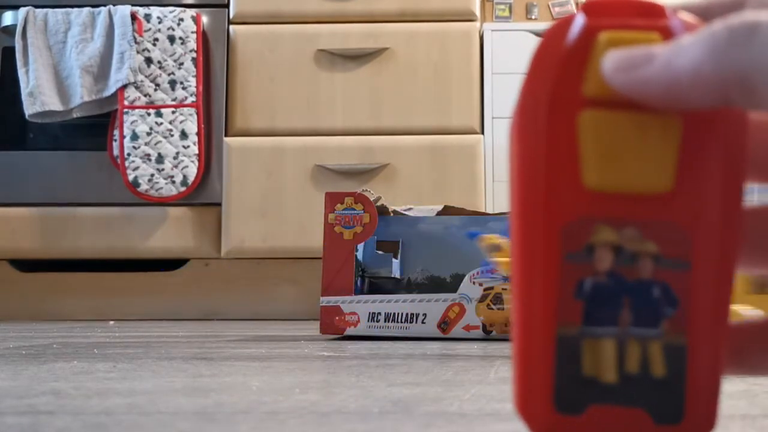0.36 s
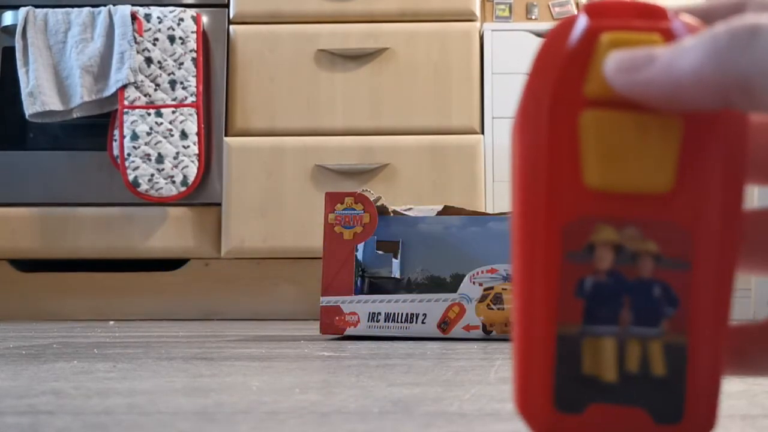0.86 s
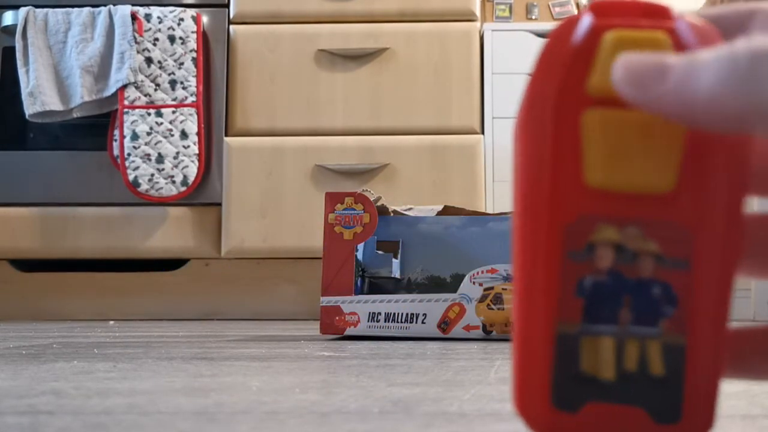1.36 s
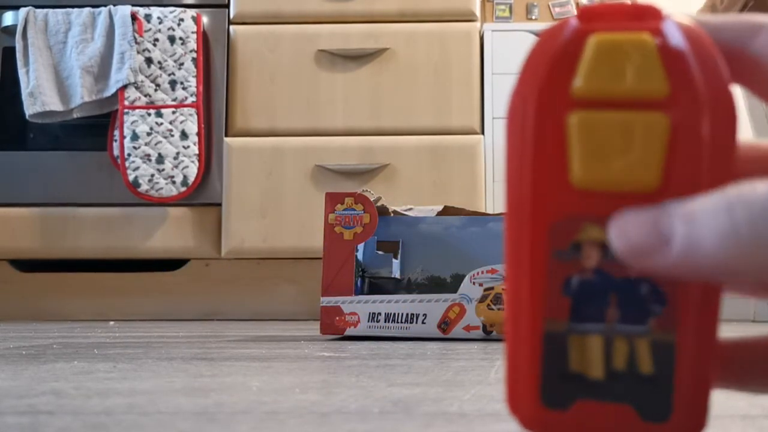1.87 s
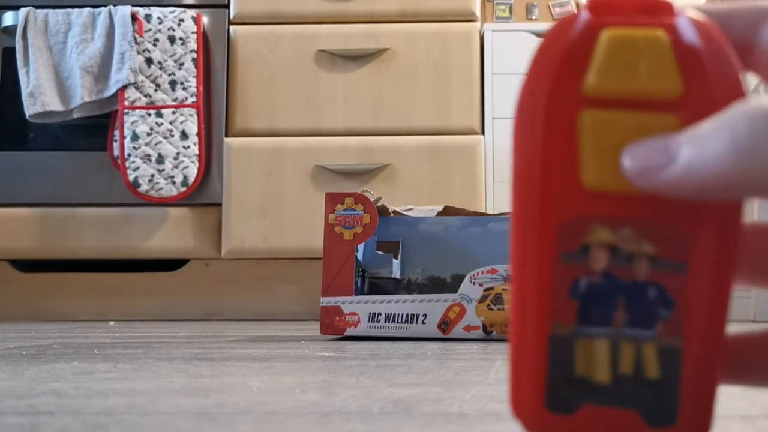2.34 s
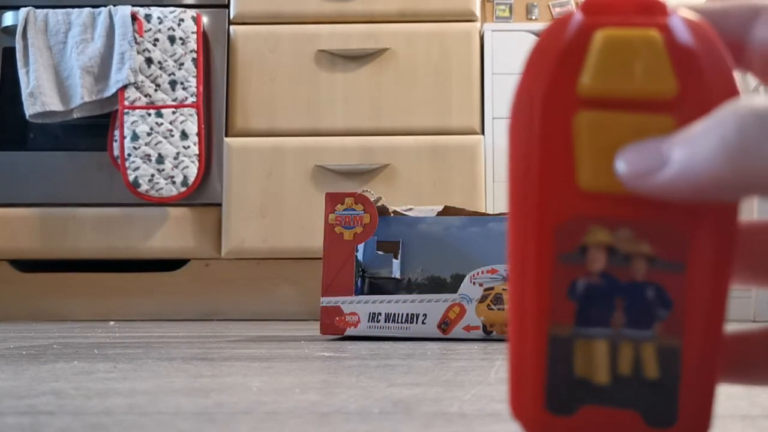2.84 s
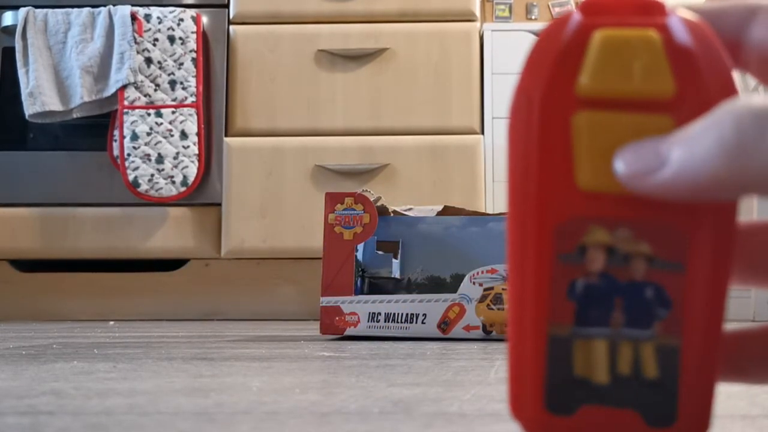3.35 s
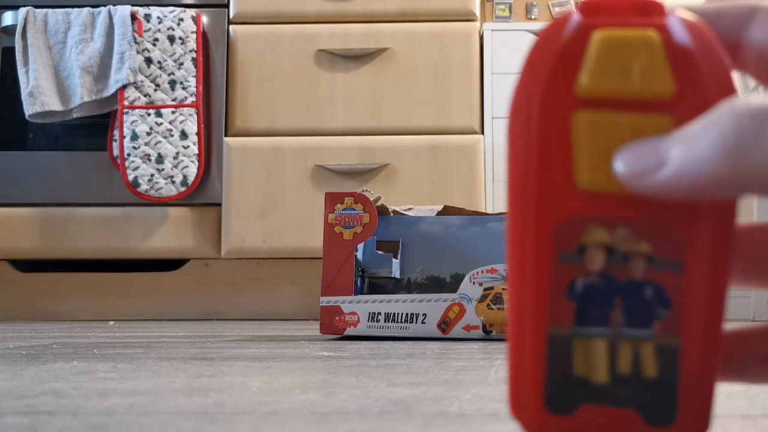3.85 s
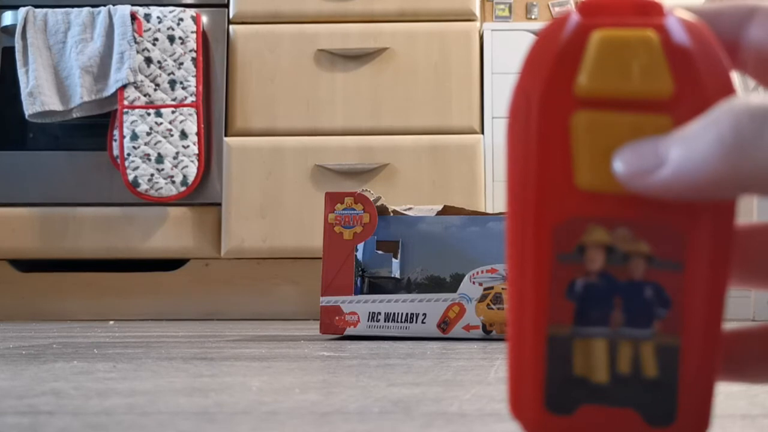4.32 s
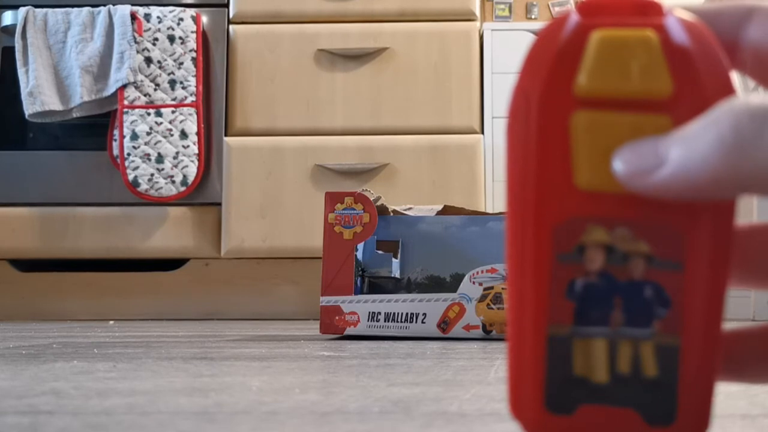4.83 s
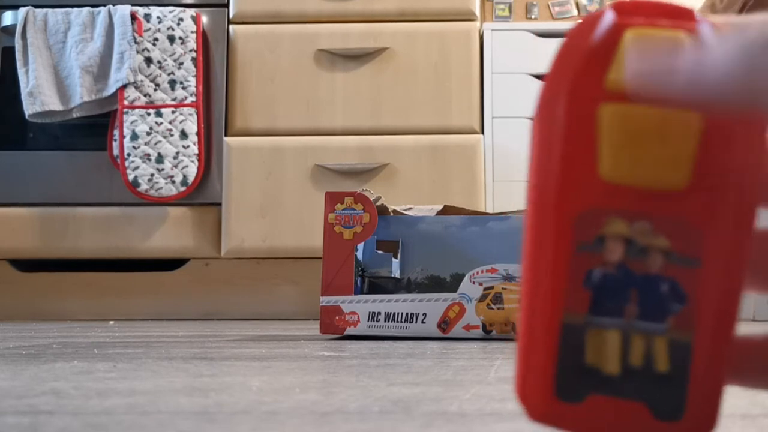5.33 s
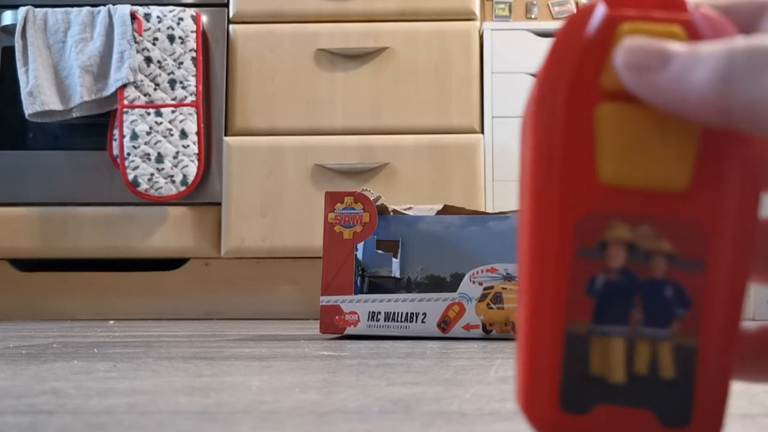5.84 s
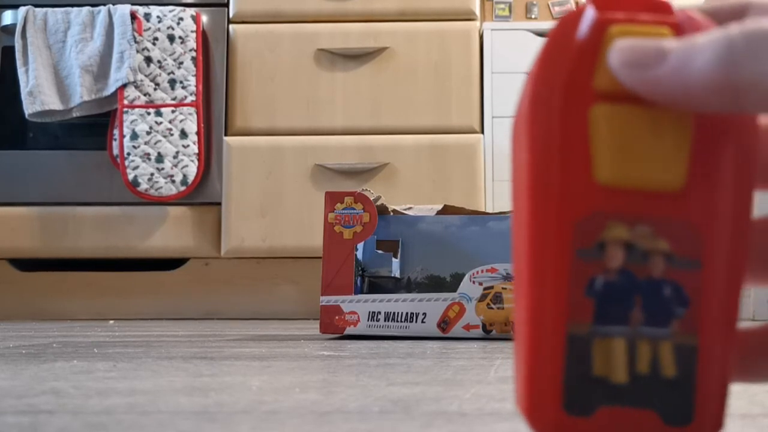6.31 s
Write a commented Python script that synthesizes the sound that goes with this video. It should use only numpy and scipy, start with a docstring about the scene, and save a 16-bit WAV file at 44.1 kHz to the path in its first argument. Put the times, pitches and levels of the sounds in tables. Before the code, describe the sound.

Buzzy plastic gears and a tiny motor drive over a hard floor in three runs, with short pauses and close button clicks.

```python
"""A small hard kitchen: a battery toy drives over the floor, right of a phone with two microphone ports.
Noise and tooth knocks shake five resonant bodies (boards, shell, gearbox, loose trim, motor); seams add jolts,
and sine overtones make the gear whine. Twice the drive dies away and starts again. Close by, a thumb hisses
along the remote, its buttons ring as short modes and a hand rubs the case. Scattered tails make the room."""
import sys
import numpy as np
from scipy import signal
from scipy.fft import rfft, irfft, next_fast_len
from scipy.io import wavfile
from scipy.ndimage import map_coordinates

SR = 44100
rng = np.random.default_rng(int(sys.argv[2]) if len(sys.argv) > 2 else 0)


def store_wav(level_fs):
    """Save 16-bit WAV to argv[1]."""
    pcm = np.round(np.clip(np.atleast_2d(level_fs), -1, 1) * 32767)
    wavfile.write(sys.argv[1], SR, pcm.T.astype(np.int16))


def field_ratio(decibels):
    """Amplitude ratio for a level in dB (20 dB per decade); scalars and array-likes work."""
    return 10 ** (np.asarray(decibels, dtype=float) / 20)


N = 284004
T = np.arange(N) / SR  # seconds

# Room and microphone noise. Each row: frequency in Hz, relative density in dB per Hz.
HUSH_COLOUR = [(20, -11.5), (86, -10.5), (220, -15), (400, -21), (650, -23.5), (5800, -36), (8000, -44),
               (9500, -49.5), (15000, -47)]
# Likeness of that noise at the two ports. Each row: frequency in Hz, left-right likeness from 0 to 1.
HUSH_LIKENESS = [(40, 0.53), (150, 0.19), (400, 0.38), (2000, 0.37), (8000, 0.13)]
# Room over direct sound. Each row: frequency in Hz, level in dB.
ROOM_LEVEL = [(300, -18), (1000, -11), (2500, 0), (5000, 7), (8000, 12)]
# Room decay; cupboards scatter the treble close by. Each row: frequency in Hz, t60 in seconds.
ROOM_T60 = [(300, .25), (2000, .09), (4500, .035), (8000, .025)]
# Microphone response. Each row: frequency in Hz, gain in dB.
MIC_RESPONSE = [(1500, -1.5), (7200, -5.5), (8000, -13), (9000, -19), (10000, -29), (15000, -33)]
# Shading of the ports by the phone's body. Each row: frequency in Hz, left over right in dB.
PORT_TILT = [(60, -2), (160, -3), (420, -5), (1100, -8), (2900, -6), (7640, -2)]
# The toy's bearing. Each row: time in seconds, left over right in dB, on top of the shading.
BEARING = [(0, 0), (.9, -0.5), (1.4, 2), (5.3, 2.5), (6.44, 1.5)]

# Thumb sliding over the remote. Each row: time in seconds, level in dB.
THUMB_SLIDE = [(2.13, -79), (2.236, -61.5), (2.34, -69), (2.48, -61)]
# Colour of skin on plastic. Each row: frequency in Hz, relative density in dB per Hz.
SKIN_COLOUR = [(300, -16), (900, -5.5), (2000, -13), (2800, -24), (6900, -19.5), (9000, -54)]
# Hand on the case. Each row: start in seconds, length in seconds, stroke gain in dB, rustle share from 0 to 1.
HAND_RUBS = [(4.9, 0.045, -57, 0.7), (5.276, 0.078, -63.5, 0.78), (5.45, 0.063, -60.5, 0.26),
             (5.678, 0.18, -58.5, 0.75), (5.948, 0.032, -63, 0.63), (6.225, 0.078, -62.5, 0.32),
             (6.326, 0.12, -71, 0.5)]
# Button clicks. Each row: start in seconds, gain in dB, case boom in dB, snap in dB, ring length share.
BUTTON_CLICKS = [(2.321, -47.5, 2.5, -19, 0.43), (2.342, -43.5, -35, -22, 1), (2.405, -48, -25, 7, 0.93),
                 (2.407, -29.5, -10, 0.5, 0.8), (5.391, -20, -2.5, 9.5, 1.01)]
# Modes of the remote's case. Each row: frequency in Hz, relative level in dB, t60 in seconds.
REMOTE_MODES = [(760, -7.5, 0.16), (822, -9, 0.15), (770, 5.5, 0.033), (640, -16, 0.014), (1168, 3, 0.015),
                (1250, 8, 0.017), (1426, 6.5, 0.018), (1820, 9.5, 0.012), (2550, 6, 0.018),
                (3200, 0, 0.017), (4650, -1, 0.0094), (5430, 0, 0.0074), (6560, -1.5, 0.0053)]

# Gear whine in the first two runs. Each row: time in seconds, rough pitch of the blurred whine in Hz, gain in dB.
GEAR_WHINE = [
    [(0.0, 1254, -47), (0.178, 1233, -51), (0.196, 1343, -52), (0.396, 1214, -45), (0.476, 1303, -48),
     (1.212, 1252, -49.5), (1.234, 1362, -56.5), (1.448, 1210, -48.5), (1.518, 1362, -63), (1.6, 1308, -57)],
    [(2.5, 1253, -56), (2.66, 1362, -55), (2.84, 1235, -50), (2.92, 1362, -58), (2.96, 1223, -44),
     (3.11, 1281, -46.5), (4.19, 1284, -55), (4.34, 1203, -56), (4.4, 1288, -52), (5.55, 1290, -55.5)],
]
# Wheels and floor. Each row: resonance in Hz, width in Hz, relative level in dB.
BOARD_MODES = [(225, 140, -19), (374, 38, -2.5), (506, 79, -6.5), (680, 162, -0.5), (818, 197, -0.5)]
# Plastic shell. Each row: resonance in Hz, width in Hz, relative level in dB.
SHELL_MODES = [(946, 400, -6.5), (1265, 175, 4.5), (1472, 402, -3.5)]
# Gearbox. Each row: resonance in Hz, width in Hz, relative level in dB.
GEARBOX_MODES = [(1687, 194, -2), (1977, 153, 4), (2386, 510, -2)]
# Rattling trim. Each row: resonance in Hz, width in Hz, relative level in dB.
TRIM_MODES = [(3020, 500, 0.5), (3725, 420, 1), (4490, 660, -5.5)]
# Motor. Each row: resonance in Hz, width in Hz, relative level in dB.
MOTOR_MODES = [(4950, 320, -2), (5816, 570, 1.5), (6464, 350, 6.5), (6744, 900, -1)]
# Button held. Each row: on in seconds, off in seconds, spin-up time constant in seconds,
# then wheel rumble, gearbox and loose parts, each in dB over the shell.
DRIVE_RUNS = [(-1, 1.507, .1, -7, -0.47, -7.5), (2.5, 5.529, 0.17, -7.5, -1.1, -6.5),
              (5.715, 8, 0.39, -8.5, 2.1, -9)]
# Distance and floor. Each row: time in seconds, drive gain in dB, extra for loose parts and motor in dB.
DRIVE_LEVEL = [(0, -43, -2.5), (.11, -47.5, -4), (.19, -50.5, -8), (.31, -48, 0.5), (.4, -45, 1.5),
               (.55, -47.5, 1), (.75, -45.5, 1.5), (.87, -43.5, -2.5), (1.02, -41, -0.5), (1.15, -45.5, 3),
               (1.33, -47, 1.5), (1.45, -45.5, 4), (2.6, -42, -1.5), (2.85, -44.5, -4), (3.1, -41.5, 0),
               (3.28, -41.5, -1), (3.43, -47, -7), (3.65, -49, 4), (4.1, -49.5, 0.5), (4.75, -49, 1.5),
               (4.95, -50.5, 0.5), (5.35, -50.5, -4), (5.5, -53, 0), (5.7, -46.5, -3), (5.8, -49, 3),
               (5.855, -44.5, -7), (5.885, -42.5, -6), (5.92, -44.5, -1), (6.02, -49, 0), (6.1, -46.5, 1),
               (6.2, -48, 0), (6.29, -44, 1), (6.37, -45.5, 0), (6.44, -51, 0)]
# The gearbox as the toy turns. Each row: time in seconds, gain in dB.
GEARBOX_TURNING = [(0, 1), (.3, -1), (.7, -1), (.85, 2), (1.08, 2), (1.25, 0), (1.55, 2), (2.55, -3),
                   (2.9, -1), (3.3, 0), (5.5, 0), (5.8, 0), (5.95, 3.5), (6.1, 0), (6.3, 0)]
# Wheels over seams. Each row: time in seconds, knock in dB, rattle in dB, both before each part's share.
SEAM_JOLTS = [(0.114, -28, -38), (0.246, -36, -33), (0.342, -23, -33), (0.376, -29, -40),
              (0.411, -28.5, -44), (0.427, -31, -42), (0.473, -24, -35), (0.557, -36, -29),
              (0.587, -22.5, -34), (0.643, -38, -48), (0.674, -27.5, -37), (0.688, -26, -34),
              (0.773, -30, -38), (0.796, -28, -38), (0.812, -30, -40), (0.826, -29, -38), (0.905, -28, -38),
              (0.929, -26.5, -38), (0.976, -30, -33), (1.01, -28, -36), (1.083, -30, -38),
              (1.125, -32, -36), (1.178, -27.5, -33.5), (1.216, -30, -36), (1.383, -30, -36),
              (1.764, -53, -70), (1.808, -52, -62), (2.565, -40, -50), (2.637, -33, -43), (2.668, -31, -43),
              (2.686, -37, -59), (2.711, -39, -44), (2.744, -39, -43), (2.758, -30.5, -40.5),
              (2.809, -31, -49), (2.832, -29, -37), (2.948, -32, -38), (2.962, -33, -38), (3.129, -29, -37),
              (3.162, -26, -35), (3.272, -30, -37), (3.347, -37, -32.5), (3.488, -31, -41.5),
              (3.626, -39, -45), (3.875, -33.5, -37), (4.477, -45, -38), (4.722, -33, -38),
              (4.816, -42, -37.5), (5.353, -44, -48), (5.907, -52, -50), (5.994, -48, -61)]
# Gears taking up their slack. Each row: time in seconds, level in dB.
SLACK_KNOCKS = [(2.485, -56), (2.497, -43.5), (2.52, -50)]

# Settings with five values run: rumble, shell, gearbox, loose parts, motor.
COAST_DB_PER_S = 130, 150, 175, 190, 205  # fade after power off
JOLT_SHARE_DB = (-16.5, -17, -19, -8.5, -14.5)  # the first three share the knock, the last two the rattle
JOLT_TAP_DB = (22, 24, 20, 24, 21)  # first sharp tap of a jolt over its noise
CHATTER_SHARE_DB = (-8, -6, -4.5, -6, -8)  # backlash taps felt by all parts


def unit(x):
    """Scaled to rms 1."""
    return x / np.sqrt(np.mean(x ** 2) + 1e-20)


def along(points, hz):
    """Reads (Hz, value) points on a log frequency axis."""
    f, v = np.transpose(points)
    return np.interp(np.log(hz + 1), np.log(f + 1), v)


def curves(rows):
    """One value per sample for each column after the time, and a gate with 10 ms ends."""
    s, *columns = np.transpose(rows)
    gate = np.clip(np.minimum(T - s[0], s[-1] - T) / .01 + 1, 0, 1)
    return [np.interp(T, s, column) for column in columns], gate


def wobble(rate):
    """A smooth random curve, rate knots a second."""
    return map_coordinates(rng.standard_normal(int(N * rate / SR) + 4), [T * rate])


def filtered(x, response):
    """x times a complex response of frequency."""
    m = next_fast_len(N + SR // 2)
    return irfft(rfft(x, m) * response(np.fft.rfftfreq(m, 1 / SR)), m)[..., :N]


def body(modes, low_hz):
    """Causal resonances, thinned out below low_hz, scaled so that white noise keeps its rms."""
    def response(f):
        ring = 0
        for k, (hz, width, db) in enumerate(modes):
            resonance = 1j * f * width / (hz * hz - f * f + 1j * f * width)
            ring = ring + (-1) ** k * field_ratio(db) * resonance
        ring = ring * (1j * f / (low_hz + 1j * f)) ** 2
        return ring / np.sqrt(np.mean(abs(ring) ** 2))
    return response


def hush():
    """Steady background noise; a shared part and an opposed part make the two ports partly alike."""
    def shape(hz):
        turn = np.arccos(np.clip(along(HUSH_LIKENESS, hz), -1, 1)) / 2
        return field_ratio(along(HUSH_COLOUR, hz)) * [np.cos(turn), np.sin(turn)]
    mid, side = filtered(rng.standard_normal((2, N)), shape)
    return field_ratio(-67.5) * unit(np.array([mid + side, mid - side]))


def room(x):
    """Noise tails decay at each frequency's own speed; new echoes 30 times a second follow the moving toy."""
    step, wet = SR // 30, np.zeros((2, N + 2 * SR))
    starts = np.arange(0, N + step, step)
    pieces = np.pad(x, (step, 2 * step))[starts[:, None] + np.arange(2 * step)] * np.hanning(2 * step)
    hz, t, z = signal.stft(rng.standard_normal((len(starts), 2, SR // 8)), SR, nperseg=256)
    z = z * field_ratio(-60 * t / along(ROOM_T60, hz)[:, None])
    energy = np.linalg.norm(z, axis=3).mean(1)[:, None, :, None]
    tails = signal.istft(z / energy, SR, nperseg=256)[1]
    tails = tails / np.linalg.norm(tails[:, :1], axis=2, keepdims=True)
    for start, answer in zip(starts, signal.fftconvolve(pieces[:, None], tails, axes=2)):
        wet[:, start:start + answer.shape[1]] += answer
    delayed = wet[:, step - 130:][:, :N]  # the room answers 130 samples late
    return filtered(delayed, lambda hz: field_ratio(along(ROOM_LEVEL, hz)))


def hand():
    """A soft skin hiss along the remote, then short low stick-slip hums and rustle."""
    (slide_db,), sliding = curves(THUMB_SLIDE)
    hiss = unit(filtered(rng.standard_normal(N), lambda hz: field_ratio(along(SKIN_COLOUR, hz))))
    hum_hz = 255 * (1 + 0.0806 * wobble(70))
    hum = np.sin(2 * np.pi * np.cumsum(hum_hz) / SR) * field_ratio(8.5 + 2.4 * wobble(60))
    palm = body([(170, 410, -4.5), (246, 51, -4.0), (480, 99, -8.5)], low_hz=80)
    rustle = 2.0 * unit(filtered(rng.standard_normal(N), palm))
    out = sliding * field_ratio(slide_db) * hiss
    rise, fall = 508, 357  # dB per second, before and after each rub
    for s, length, db, share in HAND_RUBS:
        stroke = field_ratio(db - rise * np.clip(s - T, 0, None) - fall * np.clip(T - s - length, 0, None))
        out += stroke * (hum + np.clip(share, 0, 1) * (rustle - hum))
    return out


def buttons():
    """Each click rings the remote's case: low modes follow the boom, high modes the snap; the grip damps it."""
    out, t = np.zeros(N), np.arange(SR // 5) / SR
    for s, db, boom_db, snap_db, free in BUTTON_CLICKS:
        ring = np.zeros(len(t))
        for hz, level_db, t60 in REMOTE_MODES:
            share_db = boom_db if hz < 950 else snap_db if hz > 4000 else -3
            mode_db = level_db + share_db + rng.normal(0, 0.37)
            ring += field_ratio(mode_db - 60 * t / (t60 * free)) * np.sin(2 * np.pi * hz * t)
        crack = 0.48 * field_ratio(-60 * t / 0.012) * rng.standard_normal(len(t))
        attack = 1 - np.exp(-t / 0.0014)
        out[round(s * SR):][:len(t)] += field_ratio(db) * (ring + crack) * attack
    return out


def whine():
    """Blurred overtones of the tooth rate; the fourth sits in the shell's main resonance."""
    out = np.zeros(N)
    for run in GEAR_WHINE:
        (pitch_hz, db), gate = curves(run)
        tooth_hz = pitch_hz / 4 * (1 + .006 * wobble(9) + .007 * wobble(50))
        turn = 2 * np.pi * np.cumsum(tooth_hz) / SR
        for k, overtone_db in zip((2, 3, 4), (-8, -10, 1)):
            out += gate * field_ratio(db) * field_ratio(overtone_db + 3.3 * wobble(14)) * np.sin(k * turn)
    return out


def contacts(rate, spread_db, hiss):
    """Irregular tooth knocks, about rate a second and of scattered size, on a bed of sliding noise."""
    size_db = spread_db * np.clip(rng.standard_normal(N), -2, 2)
    knocks = (rng.random(N) < rate / SR) * np.sign(rng.standard_normal(N)) * field_ratio(size_db)
    return unit(unit(knocks) + hiss * rng.standard_normal(N))


def bumps(rate, size, t60):
    """A gain that jumps at random moments, about rate a second, and dies back."""
    grain = (rng.random(N) < rate / SR) * np.minimum(rng.exponential(size=N), 2)
    return unit(1 + size * signal.fftconvolve(grain, field_ratio(-60 * T[:SR // 10] / t60))[:N])


def drive():
    """Effort in each of the five parts and drive speed: power spins up, then coasts down with the rotor."""
    (level_db, treble_db), _ = curves(DRIVE_LEVEL)
    (turning_db,), _ = curves(GEARBOX_TURNING)
    effort, speed = np.zeros((5, N)), np.ones(N)
    freewheel = field_ratio(np.array((-14, -22, -25, -29, -33)))  # the unloaded wheels run on faintly
    for on, off, spin_s, rumble_db, gearbox_db, loose_db in DRIVE_RUNS:
        spin = 1 - np.exp(-np.clip(T - on, 0, None) / spin_s)
        coast = np.clip(T - off, 0, None)
        rounded = coast ** 2 / (coast + 0.06)  # the rotor's inertia rounds the start of the fade
        fade = field_ratio(-np.outer(COAST_DB_PER_S, rounded)) + np.outer(freewheel, field_ratio(-36 * coast))
        effort += np.outer(field_ratio([rumble_db, 0, gearbox_db, loose_db, -7.5]), spin) * fade  # last: motor hiss
        speed[T > on] = spin[T > on]
    effort *= field_ratio(level_db)
    effort[2] *= field_ratio(turning_db)
    effort[3:] *= field_ratio(treble_db)
    # loose parts swing wider in level: louder when the toy is near and loud
    effort[3] *= field_ratio(0.74 * (level_db - level_db.mean()))
    return effort, speed


def unevenness():
    """Gain of each part: floor grain, small snaps, random slow and quick swells, and the turning pinion."""
    gain = np.ones((5, N)) * bumps(rate=50, size=0.14, t60=0.045)  # floor grain between the seams
    gain[2:] *= [bumps(rate=60, size=size, t60=0.0084) for size in (0.4, 1.1, 0.73)]  # small snaps
    own = np.array([wobble(25) for part in gain])
    slow = np.array([wobble(5.12) for part in gain])
    # random slow and quick swells in level
    gain *= field_ratio(0.3 * wobble(23) + 0.41 * wobble(55) + 1.05 * own + 0.6 * slow)
    shaft_hz = 82 * (1 + .06 * wobble(6))
    shaft = 2 * np.pi * np.cumsum(shaft_hz) / SR
    gain[3:] *= field_ratio(5.2 * np.sin(shaft))  # the pinion bites harder once a turn
    return gain


def chatter():
    """Plastic teeth knock each part in its own way, and backlash taps reach all of them together."""
    own = np.array([contacts(rate=400, spread_db=1.5, hiss=0.98),
                    contacts(rate=320, spread_db=1.0, hiss=1.0),
                    contacts(rate=400, spread_db=4.0, hiss=1.0),
                    contacts(rate=250, spread_db=10.0, hiss=0.87),
                    contacts(rate=450, spread_db=1.0, hiss=0.78)])
    size_db = 2.2 * np.clip(rng.standard_normal(N), -2, 2)
    taps = (rng.random(N) < 130 / SR) * field_ratio(size_db)  # about 130 a second
    return own + np.outer(field_ratio(np.array(CHATTER_SHARE_DB)), unit(taps))


def soften(x, speed):
    """Slow teeth meet softly: a low-pass follows the speed, and a rasp of strain climbs with it."""
    hz, t, z = signal.stft(x, SR, nperseg=256)
    hz, speed = hz[:, None] + 1, np.interp(t, T, speed) + 1e-3
    rasp_hz = np.interp(speed, [0, 1], (1200, 5940))  # at rest and at full speed
    band = np.exp(-.5 * (np.log(hz / rasp_hz) / 0.3) ** 2)
    against = t > 5.715  # seconds; the motor starts against the still rolling wheels
    strain = 1 + 2.2 * against * np.clip(1 - speed, 0, 1) ** 2.4 * band
    edge_hz, steep = 11600 * speed, 0.76
    return signal.istft(z * strain / np.sqrt(1 + (hz / edge_hz) ** (2 * steep)), SR, nperseg=256)[1][:, :N]


def jolts():
    """Each seam gives all parts a sharp tap and dying noise; gear slack rings floor and shell."""
    shake, t = np.zeros((5, N)), np.arange(SR // 10) / SR
    t60 = np.array((0.12, 0.12, 0.075, 0.028, 0.09))[:, None]
    dying = field_ratio(-60 * t / t60) + 1.9 * field_ratio(-60 * t / 0.005)  # ring plus a short crack
    for s, knock_db, rattle_db in SEAM_JOLTS:
        start = round(s * SR)
        blow_db = np.add(JOLT_SHARE_DB, [knock_db] * 3 + [rattle_db] * 2)
        shake[:, start:][:, :len(t)] += field_ratio(blow_db)[:, None] * dying * rng.standard_normal((5, len(t)))
        shake[:, start] += field_ratio(blow_db + JOLT_TAP_DB)
    for s, db in SLACK_KNOCKS:
        blow = field_ratio(db + np.array([[-5], [0]])) * dying[1]  # floor, shell
        shake[:2, round(s * SR):][:, :len(t)] += blow * rng.standard_normal((2, len(t)))
    return shake


def toy():
    """One uneven drive train and the seams under its wheels shake five resonant bodies."""
    effort, speed = drive()
    shake = soften(effort * unevenness() * chatter(), speed) + jolts()
    parts = (body(BOARD_MODES, low_hz=154), body(SHELL_MODES, low_hz=624), body(GEARBOX_MODES, low_hz=1110),
             body(TRIM_MODES, low_hz=2180), body(MOTOR_MODES, low_hz=3530))
    return sum(filtered(force, ring) for force, ring in zip(shake, parts))


def scene():
    """The phone's body shades the left port; the remote is close, so the room answers it less."""
    far, near = toy() + whine(), buttons() + hand()
    (path_db,), _ = curves(BEARING)
    bearing = field_ratio(np.outer([.5, -.5], path_db))
    heard = bearing * (far + room(far + field_ratio(-15.5) * near)) + near

    def port_response(hz):
        return field_ratio(along(MIC_RESPONSE, hz) + np.outer([.5, -.5], along(PORT_TILT, hz)))
    return filtered(heard, port_response) + hush()


def low_pass(x):
    """Removes everything above the highest recorded frequency."""
    return signal.sosfilt(signal.butter(12, 15140, fs=SR, output="sos"), x)


def record(dry):
    """The finished mix, as the phone keeps it."""
    return low_pass(dry)


dry = scene()
out = record(dry)
store_wav(out)
```